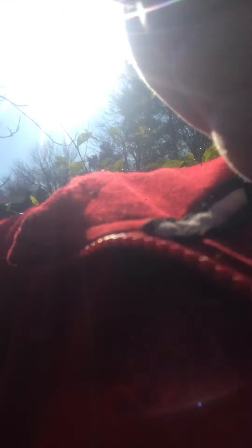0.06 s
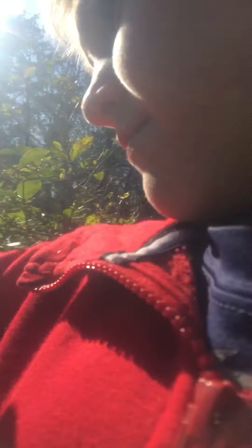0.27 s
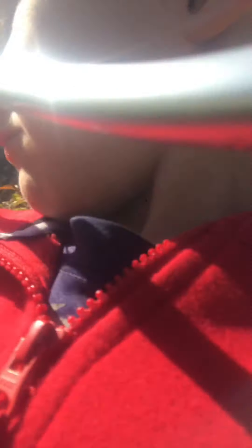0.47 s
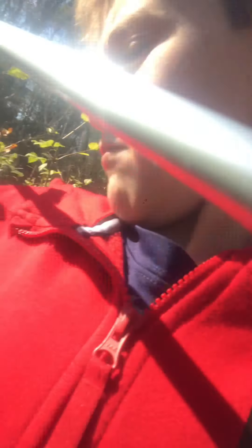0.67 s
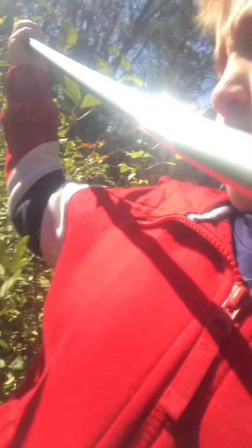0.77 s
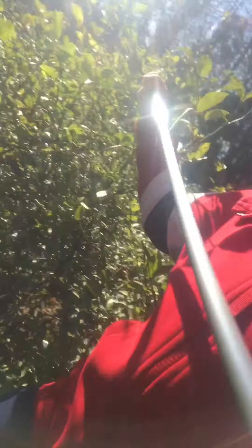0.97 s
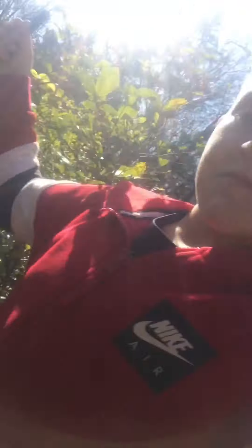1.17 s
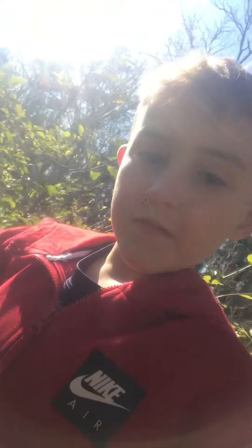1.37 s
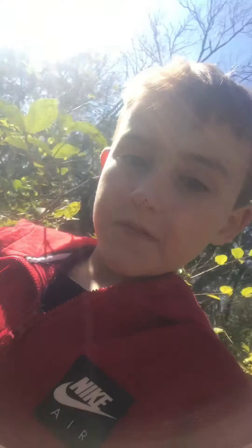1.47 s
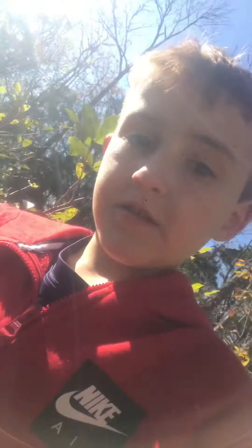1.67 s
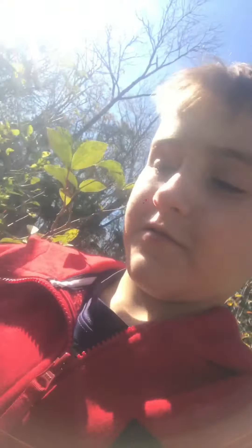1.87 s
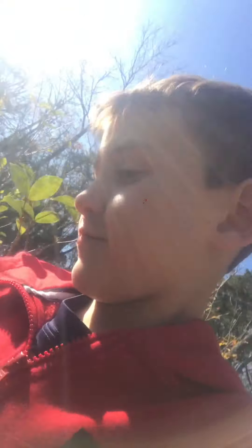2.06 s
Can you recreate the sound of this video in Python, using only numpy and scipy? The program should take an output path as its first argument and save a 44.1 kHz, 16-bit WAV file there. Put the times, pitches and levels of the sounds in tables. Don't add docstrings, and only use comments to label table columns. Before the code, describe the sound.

Close outdoor sound: one loud, short hollow pole knock, scattered twig cracks, then a thick burst of leaf rustle and splintering midway, fading to sparse ticks over faint distant hum; the phone's gain dips after the knock.

```python
import sys
import numpy as np
from scipy import signal
from scipy.fft import rfft, irfft
from scipy.io import wavfile

SR = 44100
rng = np.random.default_rng(int(sys.argv[2]) if len(sys.argv) > 2 else 0)


def transcribe(signal):
    frames = np.atleast_2d(signal).T
    limited = np.clip(frames, -1, 1)
    pcm = np.round(limited * 32767).astype(np.int16)
    wavfile.write(sys.argv[1], SR, pcm)


def makeup_ratio(level_db):
    decades = np.asarray(level_db, float) / 20
    return 10 ** decades


N = 92610

# [pitch_hz, level_db per Hz]
AIR_SPECTRUM = [(25, -30), (40, -0.5), (90, -8), (300, -12), (600, -19.5), (2000, -29.5), (6000, -34.5),
                (15800, -40)]
# [multiple of the firing rate, level_db]
ENGINE_ORDERS = [(2, -65.5), (3, -62), (4, -70.5), (5, -77.5), (6, -73), (7, -90), (8, -83.5)]
# [start_s, pitch_hz, level_db]
BIRD_WHISTLE = [
    (.025, 5700, -80),
    (.045, 5740, -65),
    (.08, 5880, -66),
    (.12, 5850, -69),
    (.165, 5550, -69),
    (.19, 5250, -80),
]
# [start_s, level_db]
BRUSH_PUSH = [(0.0, -62.5), (0.1, -69.5), (0.25, -64.5), (0.46, -62.5), (0.59, -60.5), (0.74, -50.5),
              (0.86, -51.5), (0.93, -49), (1.01, -48), (1.16, -57.5), (1.53, -66), (1.77, -65),
              (2.03, -58.5), (2.1, -63)]
# [pitch_hz, level_db per Hz]
LEAF_SPECTRUM = [(200, -1), (500, 0.5), (1200, 3.5), (2200, 0.5), (6600, 2), (10500, -2.5), (12500, 0),
                 (15800, 0)]
# [start_s, peak level_db, stem pitch_hz, decay to -60 dB_s]
STEM_TAPS = [(.135, -52.5, 9300, 0.086), (1.097, -37, 3852, 0.0552), (.154, -47, 2910, 0.022),
             (.2925, -44.5, 1327, 0.018), (.4895, -52, 1380, 0.05634), (1.157, -44.5, 3040, 0.072),
             (1.778, -53.5, 1100, .04), (1.803, -50, 1156, 0.11), (1.96, -55, 1329, 0.0274),
             (2.053, -51.5, 2000, 0.02588)]
# [start_s, peak level_db, twig pitch_hz, decay to -60 dB_s]
TWIG_SNAPS = [(.2955, -41, 4900, 0.01454), (.325, -45, 2500, .012), (.388, -44.5, 6175, .06),
              (.3965, -36.5, 1970, 0.015), (.4082, -31, 6500, 0.0122), (.4418, -34.5, 880, 0.01099),
              (.4565, -48, 2700, 0.033), (.5058, -38.5, 1213, 0.022), (.5865, -44, 2900, .01),
              (.628, -48, 1321, 0.00657), (.669, -45, 1235, 0.01218), (.709, -36.5, 2517, 0.02874),
              (.856, -38, 2903, 0.02378), (.912, -28, 3040, 0.03838), (.9365, -28, 2440, 0.02338),
              (.9528, -22.5, 1300, 0.015), (.953, -22, 7400, 0.01965), (.9787, -28, 5440, 0.01022),
              (1.003, -39, 5000, 0.02964), (1.061, -32, 3982, 0.01137), (1.0808, -27.5, 1728, 0.037),
              (1.0985, -28, 4600, 0.0143), (1.170, -40.5, 3840, 0.15), (1.4085, -44, 1200, 0.017),
              (1.8665, -42, 1585, 0.036), (2.085, -40.5, 6500, 0.02127)]
# [start_s, strength level_db, hardness_hz]
POLE_KNOCKS = [
    (.2064, -51, 9000),
    (.2185, -34, 1500),
    (0.23, -10, 8000),
    (.2322, -19.5, 2615),
]
# [pitch_hz, level_db, decay to -60 dB_s]
POLE_MODES = [(519, -5.5, 0.02892), (652, -0.5, 0.057), (964, 1, 0.026), (1156, 4, 0.019), (1464, 3, .018),
              (1670, 5, 0.016), (2180, -6, 0.027), (2530, -9, 0.029), (2906, -7.5, 0.02123),
              (3200, -9.5, 0.042), (3706, -7, 0.03021), (4510, -6.5, 0.024), (5380, -11, 0.043),
              (6870, -10.5, 0.025)]

STEADY_TOP_HZ = 15850
AIR_DB = -60
FIRING_HZ, FIRING_AT_S, ENGINE_WAVER_DB = 20.45, 1.8, 1.5
BIRD_FLUTTER_DB, BIRD_FUZZ_HZ, BIRD_LOWER_RATIO, BIRD_LOWER_DB = 3.5, 95, .9, -8
LEAF_GRAINS_PER_S, LEAF_CYCLES = 2500, 8
LEAF_GRAIN_DB, LEAF_SMOOTH_DB = -5, -1.5
SPLINTERS_PER_S, SPLINTER_SPREAD_DB = 8200, 1.5
TWIG_RING_DB, TWIG_OVERTONE_DB, TWIG_CYCLES = -11, -12, 12
FAINT_DB = -31
SLIDE_FROM_S, SLIDE_DB, SLIDE_RISE_DB = .213, -43, 20
CRACK_DB, CRACK_T60_S = -2, 0.0089
RATTLE_DB, RATTLE_T60_S, RATTLE_LOW_HZ = -24, .045, 500
THUD_DB, THUD_HZ, THUD_T60_S = -15, 231.48, 0.031
THUD_LOW_DB, THUD_LOW_HZ = -11.5, 90.256
DUCK_AT_S, DUCK_DB, DUCK_HOLD_S, DUCK_RELEASE_S = 0.217, -5.5, 0.19, 0.081
MIC_NOTCH_HZ, MIC_NOTCH_WIDTH_HZ, MIC_NOTCH_SHARE = 10409, 793, 0.2746
MIC_LOW_HZ, MIC_TOP_HZ = 32, 16950


def rms_one(x):
    return x / np.sqrt(np.mean(x ** 2) + 1e-20)


def in_time(rows):
    s, *columns = np.transpose(rows)
    return [np.interp(np.arange(N) / SR, s, c) for c in columns]


def drift(rate_hz):
    r = np.exp(-80 * np.pi * rate_hz / SR)
    noise = rng.standard_normal(N // 40 + 2002)
    slow = signal.lfilter([1], [1, -2 * r, r * r], noise)[2000:]
    return np.interp(np.arange(N) / 40, np.arange(len(slow)), rms_one(slow))


def ring(clicks, hz, t60_s):
    r = makeup_ratio(-60 / (t60_s * SR))
    w = 2 * np.pi * hz / SR
    return signal.lfilter([0, np.sin(w)], [1, -2 * r * np.cos(w), r * r], clicks + 1e-18)


def sieve(x, kind, order, hz):
    return signal.sosfilt(signal.butter(order, hz, kind, fs=SR, output="sos"), x)


def soften(x, hard_hz):
    r = np.exp(-2 * np.pi * hard_hz / SR)
    return signal.lfilter([1 - r], [1, -r], x)


def colour(x, spectrum):
    hz, db = np.transpose(spectrum)
    bins_hz = np.maximum(np.arange(N // 2 + 1) * SR / N, 1)
    gain = makeup_ratio(np.interp(np.log(bins_hz), np.log(hz), db, left=-60))
    return rms_one(irfft(rfft(x) * gain * (bins_hz < STEADY_TOP_HZ), N))


def patchy_noise(patchy_db, rate_hz):
    noise = rng.standard_normal(N)
    together = drift(rate_hz)
    edges = 30 * 2 ** np.arange(0, 9.6, .5)
    out = 0
    for low, high in zip(edges, edges[1:]):
        flicker = together + 0.932 * drift(rate_hz)
        out = out + sieve(noise, "band", 1, [low, high]) * makeup_ratio(patchy_db * flicker)
    return out


def far_air():
    return makeup_ratio(AIR_DB) * colour(patchy_noise(.3, 6.3), AIR_SPECTRUM)


def far_engine():
    turns = FIRING_HZ * (np.arange(N) / SR - FIRING_AT_S)
    out = np.zeros(N)
    for order, db in ENGINE_ORDERS:
        level = np.sqrt(2) * makeup_ratio(db + ENGINE_WAVER_DB * drift(7.0))
        out -= level * np.cos(2 * np.pi * np.round(order) * turns + 0.25 * drift(3.0))
    return out


def bird():
    hz, db = in_time(BIRD_WHISTLE)
    t = np.arange(N) / SR
    gate = (t > BIRD_WHISTLE[0][0]) & (t < BIRD_WHISTLE[-1][0])
    out = np.zeros(N)
    for ratio, voice_db in [(1, 0), (BIRD_LOWER_RATIO, BIRD_LOWER_DB)]:
        level = np.sqrt(2) * gate * makeup_ratio(db + voice_db + BIRD_FLUTTER_DB * drift(60.0))
        voice_hz = ratio * hz + BIRD_FUZZ_HZ * drift(150.0)
        out += level * np.sin(2 * np.pi * np.cumsum(voice_hz) / SR)
    return out


def leaves():
    push_db, = in_time(BRUSH_PUSH)
    sizes = makeup_ratio(3.314 * np.minimum(rng.exponential(1, N), 4)) * rng.choice([-1, 1], N)
    born = rng.random(N) < LEAF_GRAINS_PER_S * makeup_ratio(4 * drift(25)) / SR
    pitch_of = rng.integers(0, 20, N)
    grains = np.zeros(N)
    for k, hz in enumerate(np.geomspace(500, 15000, 20)):
        grains += ring(sizes * born * (pitch_of == k), hz, LEAF_CYCLES / hz) * hz / 4000
    smooth = patchy_noise(1.1, 35)
    mix = makeup_ratio(LEAF_GRAIN_DB) * rms_one(grains) + makeup_ratio(LEAF_SMOOTH_DB) * rms_one(smooth)
    return makeup_ratio(push_db) * colour(mix, LEAF_SPECTRUM)


def splintering(rows, top_ratio, rise_s):
    size = 4096
    out, t = np.zeros(N + size), np.arange(size) / SR
    for s, db, hz, t60_s in rows:
        fibres = rng.standard_normal(size) * makeup_ratio(SPLINTER_SPREAD_DB * rng.exponential(1, size))
        fibres *= rng.random(size) < SPLINTERS_PER_S / SR
        envelope = makeup_ratio(-60 * t / max(t60_s, .002)) * np.minimum(t / rise_s, 1)
        burst = sieve(fibres * envelope, "high", 3, hz)
        snap = rms_one(burst) + makeup_ratio(TWIG_RING_DB) * rms_one(ring(burst, hz, TWIG_CYCLES / hz))
        for over_hz in np.minimum(hz * rng.uniform([1.7, 3], [2.6, 6]), 13000):
            snap += makeup_ratio(TWIG_OVERTONE_DB) * rms_one(ring(burst, over_hz, TWIG_CYCLES / over_hz))
        snap = sieve(snap, "low", 4, min(top_ratio * hz, .45 * SR))
        if db < FAINT_DB:
            snap = signal.sosfilt(signal.cheby2(10, 50, STEADY_TOP_HZ, fs=SR, output="sos"), snap)
        start = int(s * SR)
        out[start:start + size] += makeup_ratio(db) * snap / np.abs(snap).max()
    return out[:N]


def stem_taps():
    return splintering(STEM_TAPS, top_ratio=1.7, rise_s=.004)


def twig_snaps():
    return splintering(TWIG_SNAPS, top_ratio=25.86, rise_s=.0003)


def pole_slide():
    t, hit_s = np.arange(N) / SR, POLE_KNOCKS[2][0]
    rise = (t - hit_s) / (hit_s - SLIDE_FROM_S)
    swell = makeup_ratio(SLIDE_DB + SLIDE_RISE_DB * rise) * (t > SLIDE_FROM_S) * (t < hit_s)
    noise = rng.standard_normal(N)
    return swell * (rms_one(ring(noise, 2950, 0.019)) + makeup_ratio(-10.5) * rms_one(ring(noise, 8000, 0.011)))


def pole_knock():
    size = 8192
    out, t = np.zeros(N + size), np.arange(size) / SR
    for s, db, hard_hz in POLE_KNOCKS:
        click = soften(1. * (t == 0), hard_hz)
        body = np.zeros(size)
        for k, (hz, mode_db, t60_s) in enumerate(POLE_MODES):
            body += (-1) ** k * makeup_ratio(mode_db - 9) * ring(click, hz, t60_s)
        crack = soften(rng.standard_normal(size), hard_hz) * makeup_ratio(CRACK_DB - 60 * t / CRACK_T60_S)
        bark = soften(sieve(rng.standard_normal(size), "high", 2, RATTLE_LOW_HZ), hard_hz)
        rattle = bark * makeup_ratio(RATTLE_DB - 60 * t / RATTLE_T60_S)
        thud = ring(click, THUD_HZ, THUD_T60_S)
        thud += makeup_ratio(THUD_LOW_DB) * ring(click, THUD_LOW_HZ, 2 * THUD_T60_S)
        start = int(s * SR)
        out[start:start + size] += makeup_ratio(db) * (body + crack + rattle + makeup_ratio(THUD_DB) * thud)
    return out[:N]


def scene():
    background = far_air() + far_engine() + bird()
    brush = leaves() + stem_taps() + twig_snaps()
    return (background + brush + pole_slide() + pole_knock())[None]


def band_limit(x):
    return signal.sosfilt(signal.butter(12, 16810, fs=SR, output="sos"), x)


def record(dry):
    t = np.arange(N) / SR - DUCK_AT_S
    duck = np.interp(t, [0, .05, DUCK_HOLD_S, DUCK_HOLD_S + DUCK_RELEASE_S], [0, 1, 1, 0])
    x = dry * makeup_ratio(DUCK_DB * duck)
    x = signal.sosfilt(signal.cheby2(12, 70, MIC_TOP_HZ, fs=SR, output="sos"), x)
    port = signal.iirpeak(MIC_NOTCH_HZ, MIC_NOTCH_HZ / MIC_NOTCH_WIDTH_HZ, SR)
    x = x - MIC_NOTCH_SHARE * signal.lfilter(*port, x)
    return band_limit(sieve(x, "high", 3, MIC_LOW_HZ))


dry = scene()
out = record(dry)
transcribe(out)
```